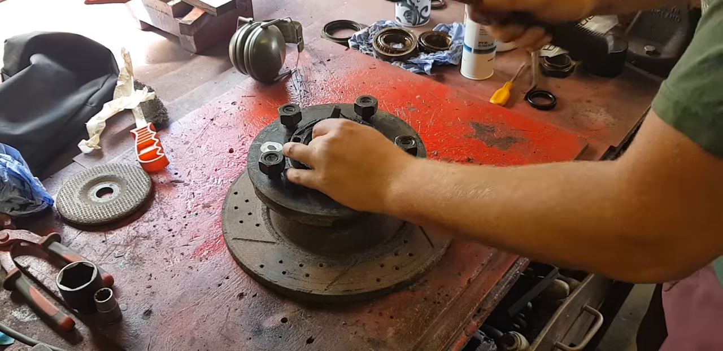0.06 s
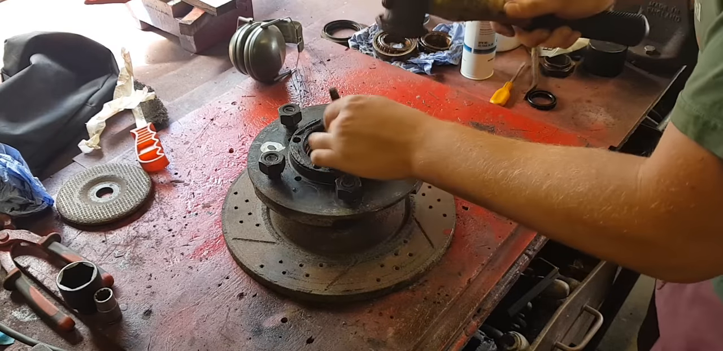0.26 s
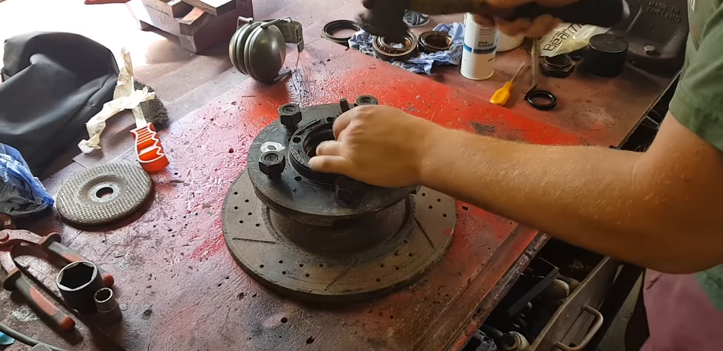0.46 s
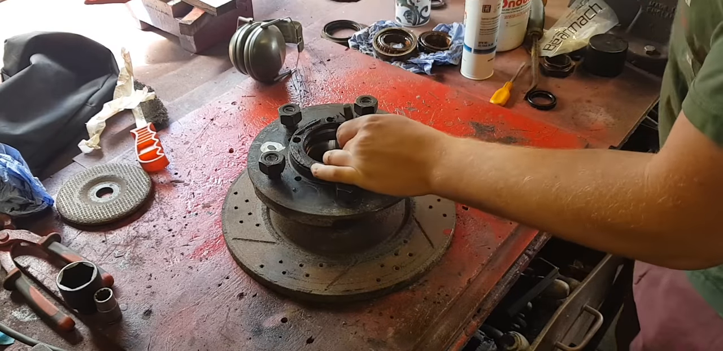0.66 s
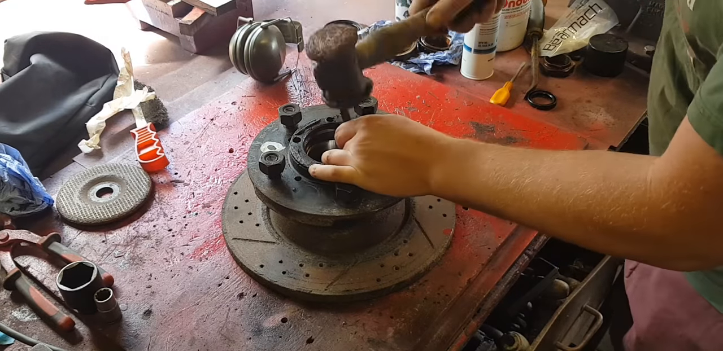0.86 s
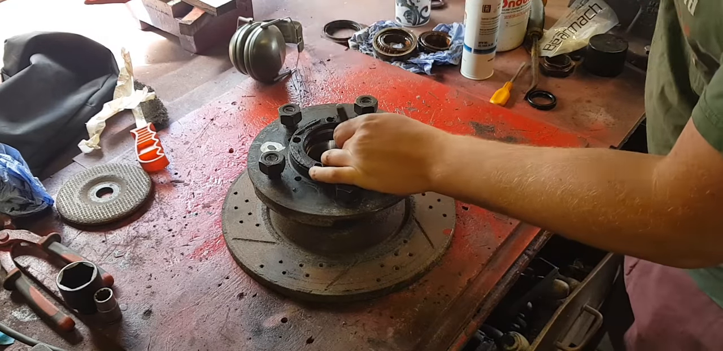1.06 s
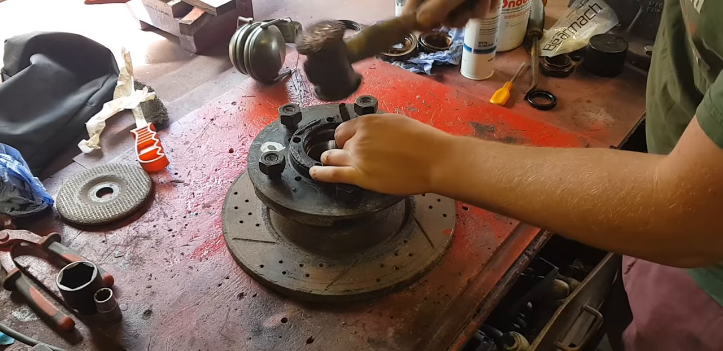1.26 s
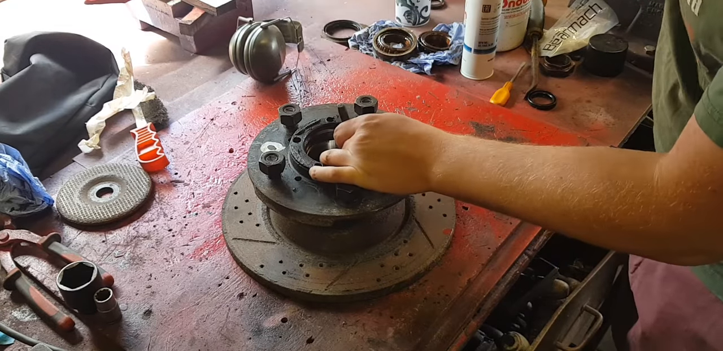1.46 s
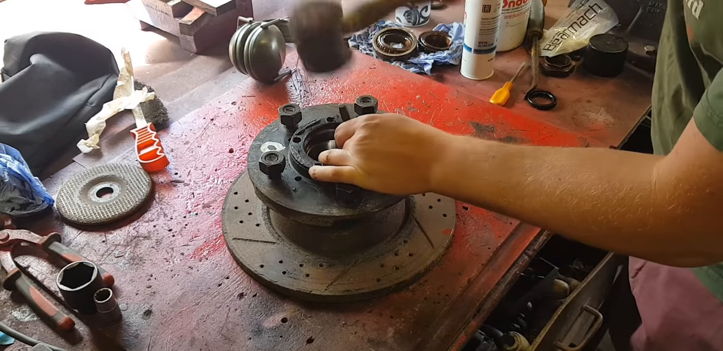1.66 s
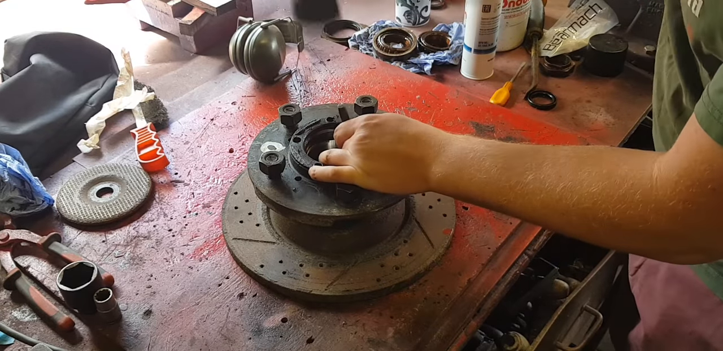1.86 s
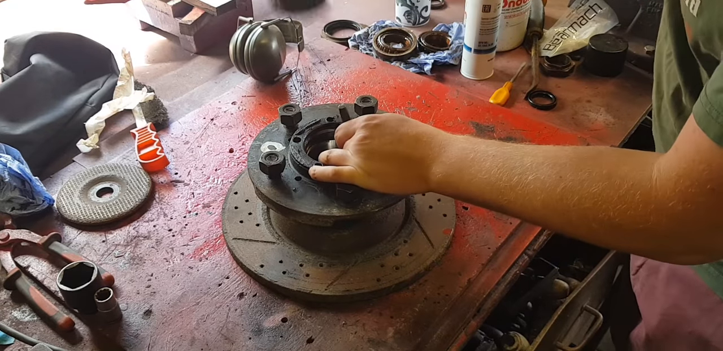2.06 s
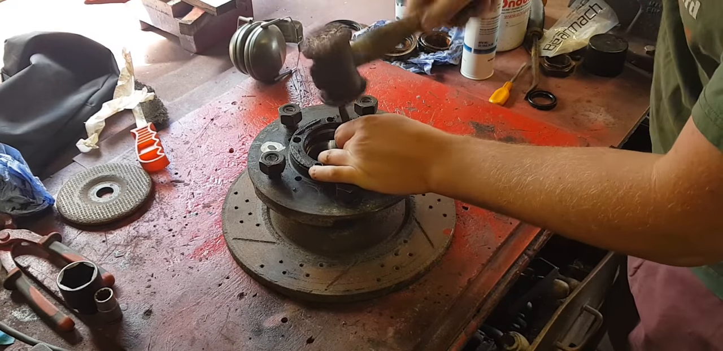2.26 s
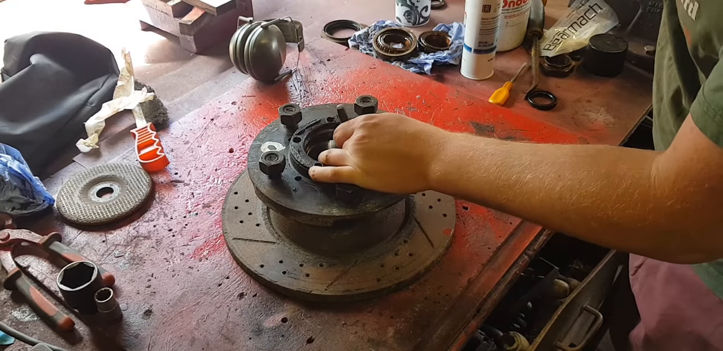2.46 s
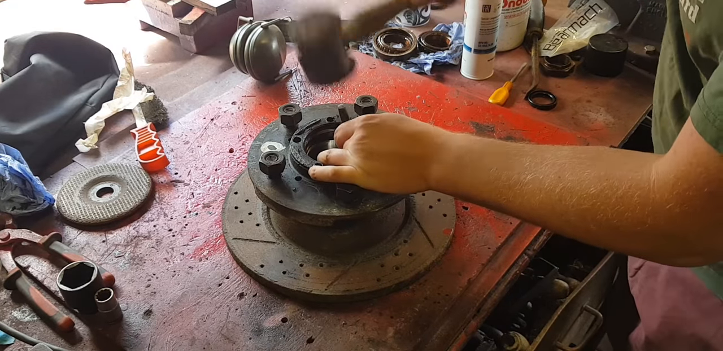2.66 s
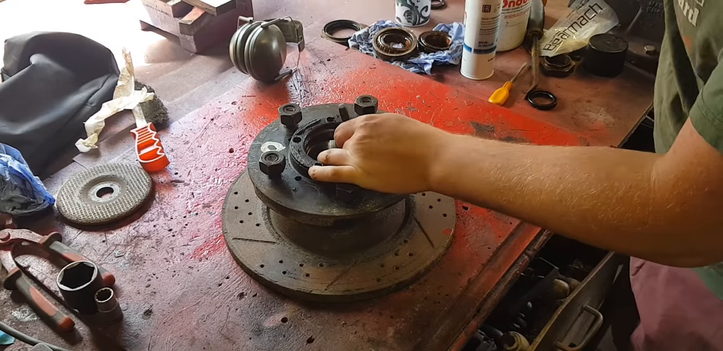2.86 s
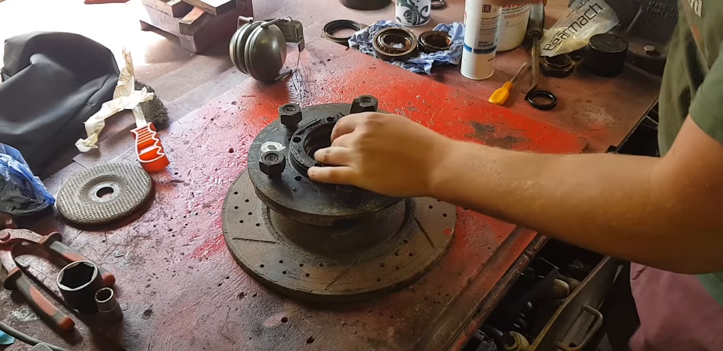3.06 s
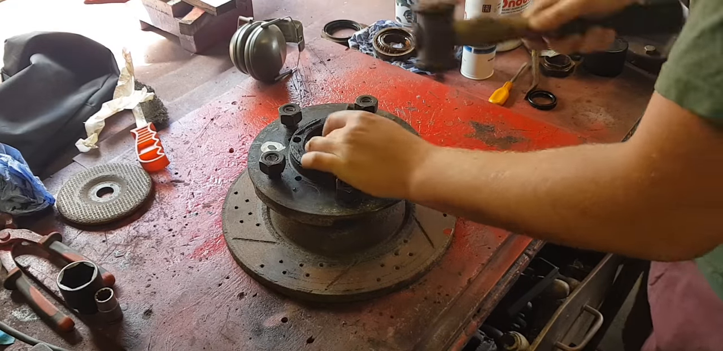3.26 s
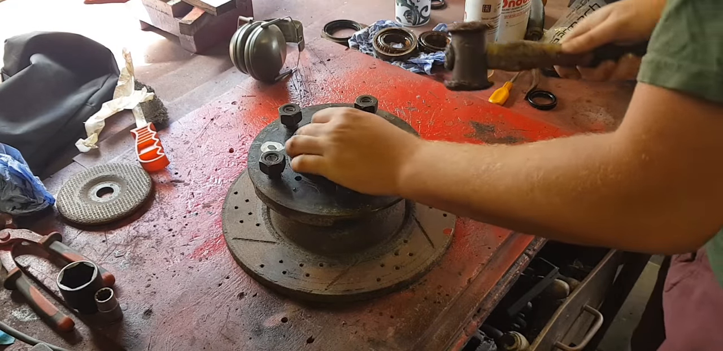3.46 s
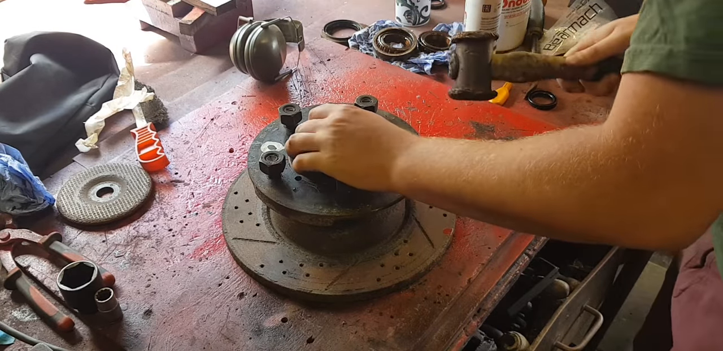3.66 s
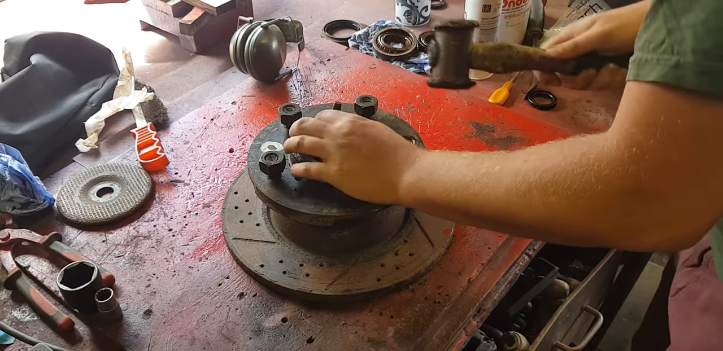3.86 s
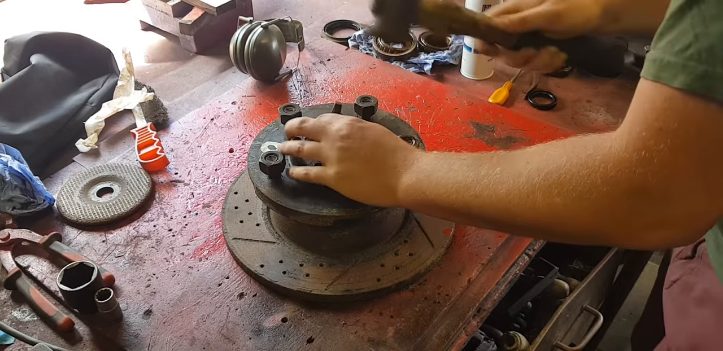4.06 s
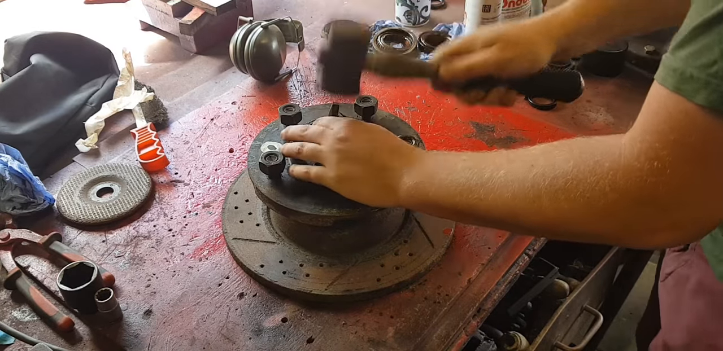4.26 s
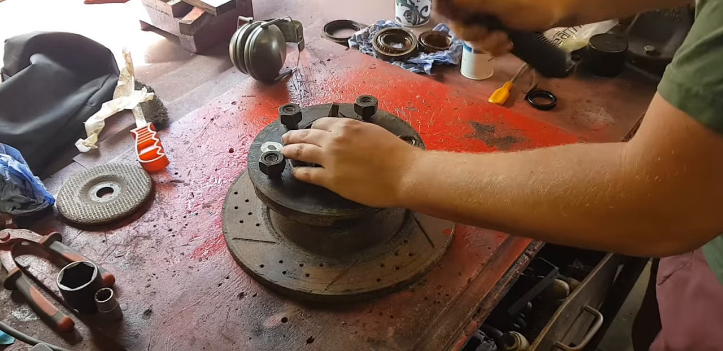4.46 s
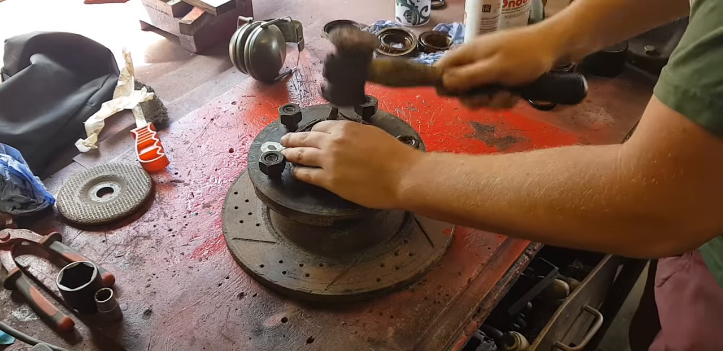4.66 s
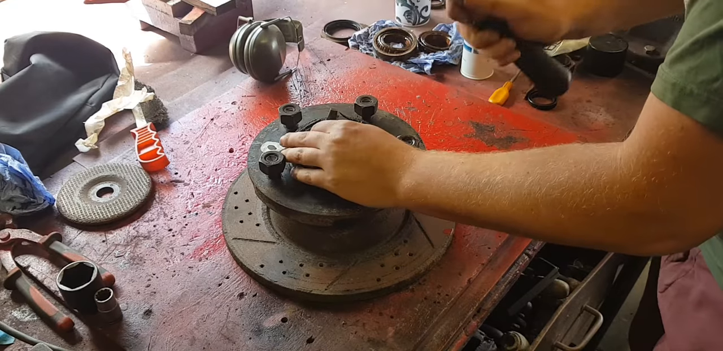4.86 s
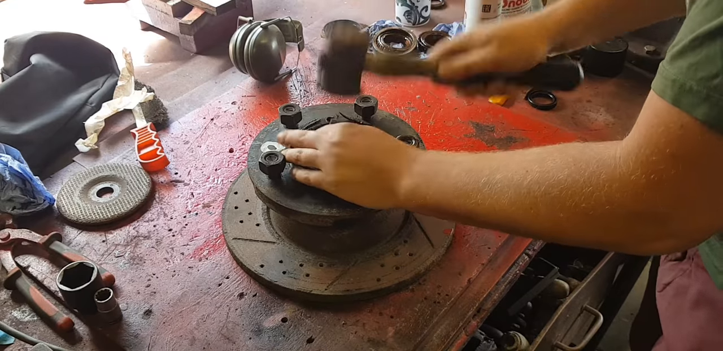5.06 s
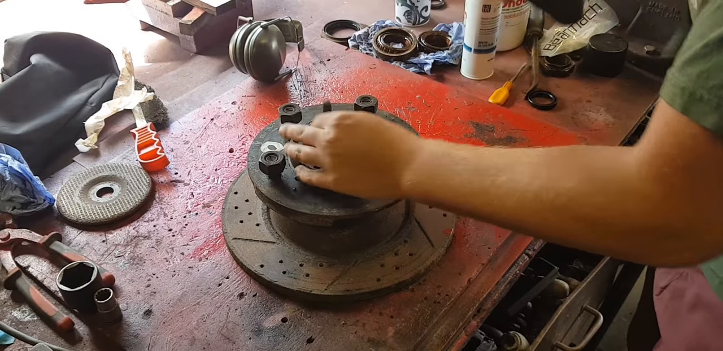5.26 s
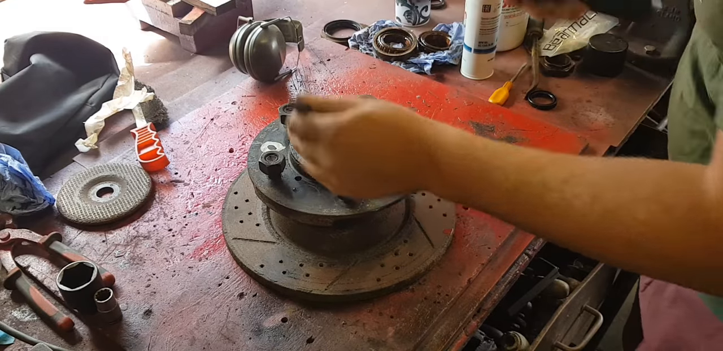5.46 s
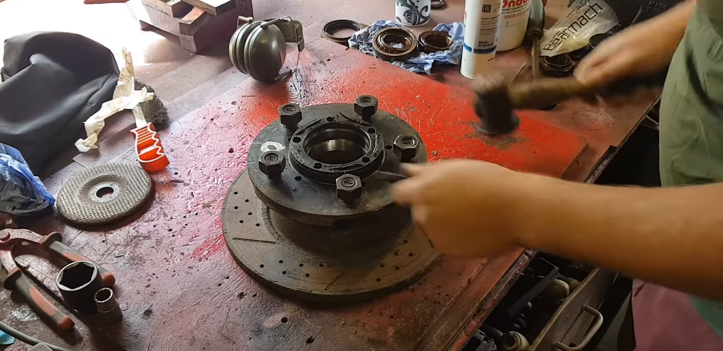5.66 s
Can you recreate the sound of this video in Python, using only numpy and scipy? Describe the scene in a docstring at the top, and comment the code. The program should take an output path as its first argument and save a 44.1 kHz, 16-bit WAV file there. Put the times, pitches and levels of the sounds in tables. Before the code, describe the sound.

A close, small garage sound with a short echo, a faint fan hum and low room tone throughout. It opens on the dying tail of a hammer blow, then a steel punch ticks lightly against an iron hub during the first second. A soft hammer tap at 0.9 seconds starts an even run, with blows at about 1.3, 1.6, 2.0, 2.3 and 2.6, the last four loudest. Each is a sharp metallic clack with a very brief high ring and a thud through the cluttered workbench. A lull follows, with faint punch clinks around 3.5. Three lighter blows land at 4.3, 4.7 and 5.0 seconds. Right after the last, the freed bearing ring drops inside the hub with a bright clank and one quick bounce. Very faint thin squeaks come near 2.6, 4.6, 4.9 and 5.5, and soft rustling lasts until the end at about 5.7.

```python
"""A hammer drives a steel punch against a bearing race in an iron hub on a cluttered workbench.
Each blow thuds in the bench, clacks in the hub and rings briefly in the hammer head.
Between runs the punch is set down with light ticks; at last the race drops out and bounces.
The small garage echoes. A fan hums over room tone, rustle and hiss; thin squeaks come and go."""
import sys
import numpy as np
from scipy import signal
from scipy.fft import rfft, irfft
from scipy.io import wavfile

SR = 44100
rng = np.random.default_rng(int(sys.argv[2]) if len(sys.argv) > 2 else 0)


def master(y):
    """Save y as 16-bit WAV."""
    cut = np.clip(np.atleast_2d(y).T, -1, 1)
    pcm = np.round(cut * 32767)  # scale
    wavfile.write(sys.argv[1], SR, pcm.astype(np.int16))


N = 251362
LEAD = SR // 2   # pre-roll, samples: earlier tails reach into the start

# Table levels are relative.
# hammer blows, the first heard only by its tail: start_s, thud_db, clack_db, tick_db
HAMMER_BLOWS = [(-0.14, -14, -19.5, -24.5), (0.902, -27.5, -30, -32.5), (1.285, -15, -30, -24),
                (1.617, -10.5, -19.5, -20.5), (1.957, -8.5, -16.5, -22), (2.289, -9, -15.5, -22),
                (2.629, -10, -15.5, -18.5), (4.334, -25, -36, -35), (4.686, -17, -22.5, -20.5),
                (5.039, -28, -23.5, -21)]
# punch touching the hub: start_s, knock_db, tick_db, ring_db
PUNCH_TOUCHES = [(0.112, -58, -88, -92), (0.326, -67, -50.5, -64), (0.389, -72, -57, -79),
                 (.499, -43, -49, -72), (0.662, -60.5, -79, -98), (.866, -52, -85, -88.5),
                 (.989, -47.5, -38, -61), (3.439, -73.5, -59.5, -62), (3.453, -61, -54, -56),
                 (3.591, -69, -72, -84), (5.036, -54.5, -35, -41)]
# freed race landing and bouncing: start_s, thud_db, clack_db, ring_db
RACE_DROPS = [(5.056, -23.5, -14, -10), (5.0986, -39, -29, -15)]
# hammer head: pitch_hz, level_db, t60_s
HAMMER_MODES = [(2073, -10, .04), (3118, -9, .05), (6175, -11, .04), (8554, -6, .06), (11350, -5, .03),
                (11480, -1, .1), (12500, -9, .03), (13590, -3, .07)]
# steel punch: pitch_hz, level_db, t60_s
PUNCH_MODES = [(1450, 1.5, 0.044), (3079, -5, 0.16), (6090, -0.5, .11), (9070, 6, 0.13)]
# bearing race: pitch_hz, level_db, t60_s
RACE_MODES = [(1147, -1, .02), (2300, -1, .015), (2800, -6, .006), (4210, 0, .014), (6266, -10, .015)]
# iron hub: pitch_hz, level_db, t60_s
HUB_MODES = [(630, -5, .03), (750, -8, .03), (958, -2, .22), (1110, -2, .12), (1180, -5, .04),
             (1330, -7, .03), (1450, -7, .04), (1680, -9, .03)]
# air inside the hub: pitch_hz, level_db, t60_s
CAVITY_MODES = [(385, 1, .08)]
# whole bench on its legs: pitch_hz, level_db, t60_s
SWAY_MODES = [(70, -12, 0.39), (79.66, 1.5, 0.18), (134, -8.5, 0.18), (171.3, 0.5, 0.24)]
# bench top: pitch_hz, level_db, t60_s
TOP_MODES = [(203, -1, .08), (232.6, 0.5, 0.059), (258, -1, .08), (289, -2, 0.072), (333.3, 1.5, 0.011),
             (367.5, 4, 0.059), (423, -2, 0.1), (474, -14.5, 0.018), (602, -14, 0.18), (720, -10, 0.024)]
# clack in the hub: freq_hz, density_db
CLACK_SPECTRUM = [(300, -12.5), (700, -3.5), (1200, -6), (2000, -6.5), (4000, -6.5), (5500, -13.5),
                  (7500, -13), (16000, -39.5)]
# tick of steel on steel: freq_hz, density_db
TICK_SPECTRUM = [(2500, -16.5), (5500, -3), (7200, -5.5), (9000, 0.5), (11500, 0.5), (14000, -1.5),
                 (16500, -11)]
# tools and parts shaken on the top: freq_hz, density_db
CLUTTER_SPECTRUM = [(60, -31.5), (130, -7), (220, 2), (400, -0.5), (500, -6), (650, -7), (1200, -17),
                    (3000, -45.5)]
# garage echoes: freq_hz, t60_s, level_db
GARAGE_DECAY = [(60, 0.65, -11.5), (196, .3, -15), (581.4, 0.24, -9.5), (2050, .28, -3.5), (6040, 0.27, -5),
                (13800, .2, -4.5)]
# left-right likeness of echoes and room tone: freq_hz, correlation
STEREO_CORRELATION = [(60, 0.95), (250, .9), (500, 0.87), (1000, 0.14), (4000, 0.28), (12000, 0.058)]
# uneven shading by bench and body: freq_hz, left_minus_right_db
SHADING = [(60, -1), (150, 0.5), (380, -2.5), (950, -3), (2380, -4.5), (5980, 0.5), (15000, 0)]
# fan resonances: pitch_hz, width_hz, level_db
FAN_HUM = [(59, 4.7, -67), (98.4, 14, -67), (185.4, 8.1, -78)]
# thin squeaks and rubs: start_s, length_s, start_hz, flutter_hz, level_db
SQUEAKS = [(2.55, 0.11, 3760, 150, -65), (4.58, 0.106, 3340, 792, -70.5), (4.835, 0.16, 5100, 500, -66),
           (5.45, .3, 3884, 150, -68.5), (5.561, 0.083, 2190, 1523, -67.5)]
# soft rustle and thin top hiss: time_s, rustle_db, hiss_db
RUSTLE_LEVELS = [(0, -68, -71), (.2, -76, -81), (.45, -72, -83), (.8, -70.5, -83), (1.201, -81.5, -81),
                 (2.5, -75.5, -80.5), (3.3, -84, -80), (3.9, -79.5, -88), (4.3, -74.5, -82),
                 (4.9, -78.5, -78.5), (5.35, -75, -73.5), (5.7, -74.5, -74.5)]
# room tone: freq_hz, density_db
ROOM_SPECTRUM = [(15, -46), (25, -22), (76, -4.5), (103, -9), (124, -8.5), (146, -9), (296, -20.5),
                 (600, -31), (927, -28), (2330, -41.5), (5270, -37.5), (8370, -56), (11900, -41.5),
                 (15200, -49.5), (16500, -59.5)]

# columns of a contact row; RING_DB drives the striking part, PAN_DB is left minus right
START_S, SWAY_DB, TOP_DB, HUB_DB, CLACK_DB, TICK_DB, RING_DB, PAN_DB = range(8)
BLOW_PAN_DB = 0.13
THUD_LAG_S = .0015   # time to load the bench through the hub


def hammer_blows():
    """Contact rows: a blow shares its force among bench, hub and hammer head."""
    start_s, thud_db, clack_db, tick_db = np.transpose(HAMMER_BLOWS)
    hub_db = -4 + .71 * clack_db   # grows more slowly than the clack
    head_db = 5 + tick_db + .47 * thud_db
    return contact_rows(start_s, sway_db(thud_db), thud_db, hub_db, clack_db, tick_db, head_db,
                        BLOW_PAN_DB)


def punch_touches():
    """Contact rows: the punch knocks the hub and barely stirs the bench."""
    start_s, knock_db, tick_db, ring_db = np.transpose(PUNCH_TOUCHES)
    clack_db = knock_db - 3.5 + .24 * (tick_db - knock_db)   # a sharp tick lifts the clack
    pan_db = -1 + .42 * np.maximum(ring_db - knock_db + 15, 0)   # a ringing punch sits further left
    return contact_rows(start_s, knock_db - 4.5, knock_db - 10, knock_db, clack_db, tick_db, ring_db,
                        pan_db)


def race_drops():
    """Contact rows: the race lands inside the hub."""
    start_s, thud_db, clack_db, ring_db = np.transpose(RACE_DROPS)
    hub_db, tick_db = ring_db - 11, ring_db - 32.5
    return contact_rows(start_s, sway_db(thud_db) - 22, thud_db, hub_db, clack_db, tick_db, ring_db,
                        BLOW_PAN_DB)


def metal_rings(blows, touches, drops):
    """Hub, striking parts and hub cavity ring; hard hits press the hub into the bench and choke it."""
    hard_hits = np.vstack([blows, drops])
    out = from_db(.5) * struck(hard_hits, HUB_DB, HUB_MODES, spread_db=2.5, swell_cycles=1.8,
                               max_t60_s=.055)
    out += from_db(-1.5) * struck(touches, HUB_DB, HUB_MODES, spread_db=2, swell_cycles=2.3)
    out += from_db(-4.5) * struck(blows, RING_DB, HAMMER_MODES, spread_db=2.5, swell_cycles=2.3)
    out += from_db(2.5) * struck(touches, RING_DB, PUNCH_MODES, spread_db=1.5, swell_cycles=2.6)
    out += from_db(-3) * struck(drops, RING_DB, RACE_MODES, spread_db=1, swell_cycles=1.5)
    out += from_db(14.5) * struck(drops, TOP_DB, CAVITY_MODES, spread_db=.3, swell_cycles=4.8)
    return out


def impact_noise(rows):
    """The hub clacks, steel ticks on steel, the clutter on the top rumbles."""
    clack = burst(rows, CLACK_DB, CLACK_SPECTRUM, crack_s=.011, rattle_s=.073, rattle_db=-13, width=1)
    tick = burst(rows, TICK_DB, TICK_SPECTRUM, crack_s=.013, rattle_s=.07, rattle_db=-9, width=1)
    clutter = burst(rows, TOP_DB, CLUTTER_SPECTRUM, crack_s=.052, rattle_s=.24, rattle_db=-9, width=.25)
    return from_db(14) * clack + from_db(5) * tick + from_db(15.5) * delay(clutter, THUD_LAG_S)


def bench(rows):
    """The bench sways on its legs; its top thuds, damped by the clutter."""
    sway = from_db(-4.5) * struck(rows, SWAY_DB, SWAY_MODES, spread_db=1.5, swell_cycles=4.5)
    top = from_db(-1.5) * struck(rows, TOP_DB, TOP_MODES, spread_db=2.5, swell_cycles=4.5, max_t60_s=.055)
    thud = sway + top
    thud += from_db(-5) * delay(thud, delay_s=.021)   # the hub hops and lands again
    return signal.sosfilt(signal.butter(4, 60, "high", fs=SR, output="sos"), thud)


def sway_db(thud_db):
    """Bench sway grows more slowly than the thud."""
    return -7.5 + .55 * thud_db


def bench_bump(start_s=.023, thud_db=-48):
    """Contact row: a dull bump in the bench alone."""
    silent_metal_db = [-200] * 4
    return contact_rows([start_s], sway_db(thud_db), thud_db, *silent_metal_db, BLOW_PAN_DB)


def garage(dry):
    """Dense echoes build up in a few ms and die band by band."""
    t = np.arange(int(.7 * SR)) / SR
    echoes = 0
    for hz, band in noise_bands(len(t)):
        t60_s, level_db = at_hz(GARAGE_DECAY, hz), at_hz(GARAGE_DECAY, hz, column=2)
        echoes += from_db(level_db - 60 * t / t60_s) * band
    echoes *= from_db(-22) * (1 - np.exp(-t / .00092))
    return signal.oaconvolve(dry.mean(axis=0)[None], echoes, axes=1)[:, :N + LEAD]


def fan(t, motor_hz=100.4, motor_rms_db=-61.5):
    """Steady motor tone plus a wavering hum of noise in narrow resonances."""
    out = from_db(motor_rms_db) * np.sqrt(2) * np.sin(2 * np.pi * motor_hz * t)
    for hz, width_hz, level_db in FAN_HUM:
        hum = ring(rng.standard_normal(N + LEAD), hz, t60_s=2.2 / width_hz)[LEAD:]
        out += from_db(level_db) * unit_rms(hum)
    return out


def squeaks(t, rise=.038):
    """Faint tones, climbing slightly, blurred by slow noise."""
    out, white = 0, rng.standard_normal((2, N))
    for start_s, length_s, start_hz, flutter_hz, level_db in SQUEAKS:
        progress = np.clip((t - start_s) / length_s, 0, 1)
        cycles = np.cumsum(start_hz * (1 + rise * progress)) / SR
        flutter = unit_rms(signal.sosfilt(signal.butter(2, flutter_hz, fs=SR, output="sos"), white))
        envelope = from_db(level_db) * np.sqrt(np.sin(np.pi * progress) + 1e-12)
        out += envelope * flutter * np.sin(2 * np.pi * cycles)
    return out


def rustle_and_hiss(t):
    """Two noise bands drifting in level."""
    time_s, rustle_db, hiss_db = np.transpose(RUSTLE_LEVELS)
    rustle = from_db(np.interp(t, time_s, rustle_db)) * band_noise(low_hz=910, high_hz=6000)
    hiss = from_db(np.interp(t, time_s, hiss_db)) * band_noise(low_hz=11300, high_hz=15800)
    return rustle + hiss


def room_tone(rms_db=-64.5):
    """Steady, mostly low noise."""
    air = sum(from_db(at_hz(ROOM_SPECTRUM, hz)) * band for hz, band in noise_bands(N + LEAD))
    return from_db(rms_db) * unit_rms(air[:, LEAD:])


def contact_rows(*columns):
    """One row a contact, START_S to PAN_DB."""
    return np.column_stack(np.broadcast_arrays(*columns))


def clicks(rows, level_db):
    """One panned click a contact."""
    out = np.zeros((2, N + LEAD))
    onsets = np.round(rows[:, START_S] * SR).astype(int) + LEAD
    out[:, onsets] = from_db(level_db + rows[:, PAN_DB] * np.array([[.5], [-.5]]))
    return out


def struck(rows, column, modes, spread_db, swell_cycles, max_t60_s=1):
    """Each contact strikes each mode with a new strength; a heavy body takes some cycles to swell."""
    out, scatter_db = 0, rng.normal(0, spread_db, (len(rows), len(modes)))
    for (hz, level_db, t60_s), offset_db in zip(modes, scatter_db.T):
        swell_s = swell_cycles / hz
        hits = clicks(rows, rows[:, column] + level_db + offset_db)
        drive = ring(hits, hz, swell_s) * 14 / (swell_s * SR)
        out += ring(drive, hz, min(t60_s, max_t60_s))
    return out


def burst(rows, column, spectrum, crack_s, rattle_s, rattle_db, width):
    """Noise of a short crack and a longer rattle of loose parts; both times are t60."""
    t = np.arange(SR // 3) / SR
    fade = from_db(-60 * t / crack_s) + from_db(rattle_db - 60 * t / rattle_s)
    envelope = signal.oaconvolve(clicks(rows, rows[:, column]), fade[None])[:, :N + LEAD]
    mid, side = rng.standard_normal((2, N + LEAD))
    return colour(envelope * (mid + width * side * [[1], [-1]]), on_grid(spectrum))


def ring(x, hz, t60_s):
    """Resonator: a unit click starts a decaying sine of height 1."""
    radius, angle = from_db(-60 / (t60_s * SR)), 2 * np.pi * hz / SR
    return signal.lfilter([0, np.sin(angle)], [1, -2 * radius * np.cos(angle), radius ** 2], x + 1e-18)


def noise_bands(size):
    """Third-octave bands of partly correlated stereo noise: yields centre_hz, band."""
    edges_hz, white = 25 * 2 ** (np.arange(30) / 3), rng.standard_normal((2, 2, size))
    for k, (low_hz, high_hz) in enumerate(zip(edges_hz, edges_hz[1:])):
        bandpass = signal.butter(2, [low_hz, high_hz], "band", fs=SR, output="sos")
        mid, side = signal.sosfilt(bandpass, white[k % 2])
        centre_hz = np.sqrt(low_hz * high_hz)
        correlation = at_hz(STEREO_CORRELATION, centre_hz)
        yield centre_hz, np.sqrt(1 + correlation) * mid + np.sqrt(1 - correlation) * side * [[1], [-1]]


def band_noise(low_hz, high_hz):
    """Uncorrelated stereo noise, rms 1."""
    bandpass = signal.butter(4, [low_hz, high_hz], "band", fs=SR, output="sos")
    return unit_rms(signal.sosfilt(bandpass, rng.standard_normal((2, N))))


def colour(x, spectrum_db):
    """Minimum-phase filter; one spectrum a channel or one for both."""
    cepstrum = irfft(np.log(from_db(np.atleast_2d(spectrum_db))))
    cepstrum[..., 1:1024] *= 2
    cepstrum[..., 1025:] = 0
    impulse = irfft(np.exp(rfft(cepstrum)))[..., :1024]
    return signal.oaconvolve(x, impulse, axes=-1)[..., :N + LEAD]


def on_grid(spectrum):
    """Spectrum at the bins of the colour filter."""
    return at_hz(spectrum, np.maximum(np.fft.rfftfreq(2048, 1 / SR), 10))


def at_hz(table, hz, column=1):
    """Interpolate on a log-frequency axis."""
    table = np.array(table)
    return np.interp(np.log(hz), np.log(table[:, 0]), table[:, column])


def delay(x, delay_s):
    """Circular delay."""
    return np.roll(x, round(delay_s * SR), axis=1)


def from_db(db):
    """dB to gain."""
    return 10 ** (np.asarray(db) / 20)


def unit_rms(x):
    """Scale to rms 1."""
    return x / np.sqrt(np.mean(x ** 2) + 1e-20)


def scene():
    """Contacts sound in metal and bench, echo in the garage and stand over the background."""
    blows, touches, drops = hammer_blows(), punch_touches(), race_drops()
    contacts = np.vstack([blows, touches, drops, bench_bump()])
    noise = impact_noise(contacts)
    rings = delay(bench(contacts), THUD_LAG_S) + metal_rings(blows, touches, drops)
    echoes = garage(noise + from_db(-7) * rings)   # rings radiate mostly toward the near microphone
    direct = noise + rings
    direct[1] = np.roll(direct[1], 2)   # the left channel hears the hub 2 samples sooner
    work = colour(direct + echoes, on_grid(SHADING) * [[.5], [-.5]])[:, LEAD:]
    t = np.arange(N) / SR
    return work + room_tone() + fan(t) + rustle_and_hiss(t) + squeaks(t)


def record(dry):
    """Soft clip, then steep low-pass."""
    ceiling, cutoff_hz = .92, 16900
    rounded = ceiling * np.tanh(dry / ceiling)
    return signal.sosfilt(signal.cheby2(12, 70, cutoff_hz, fs=SR, output="sos"), rounded)


dry = scene()
out = record(dry)
master(out)
```